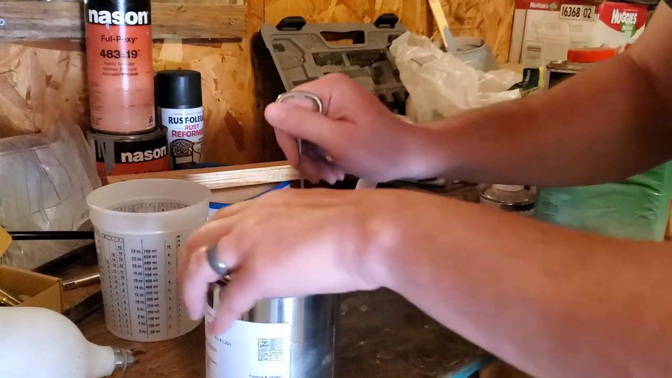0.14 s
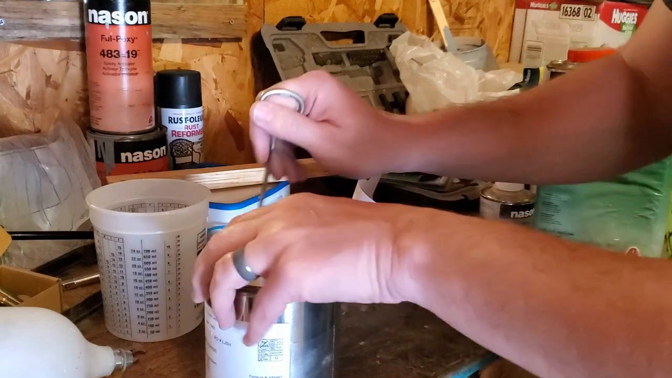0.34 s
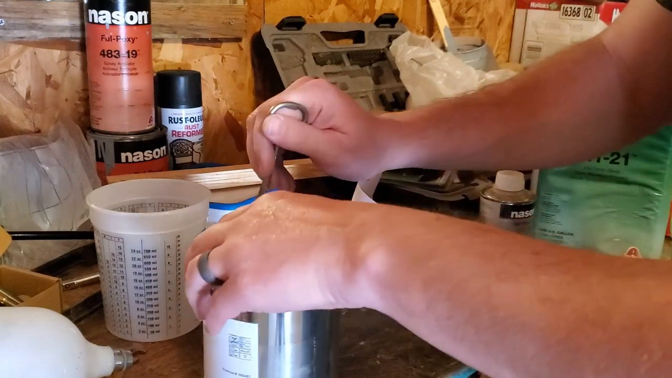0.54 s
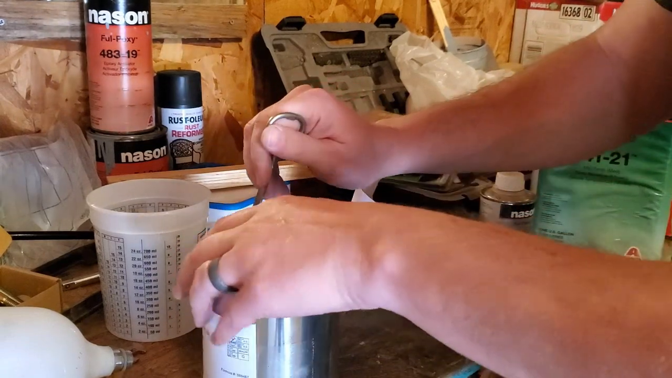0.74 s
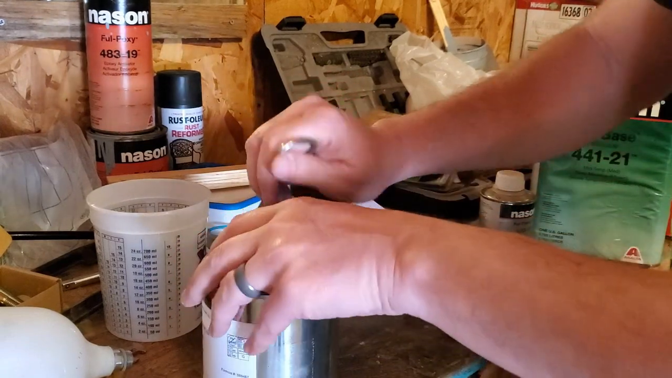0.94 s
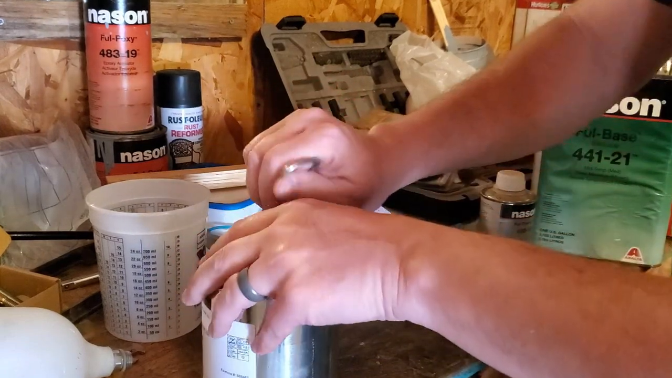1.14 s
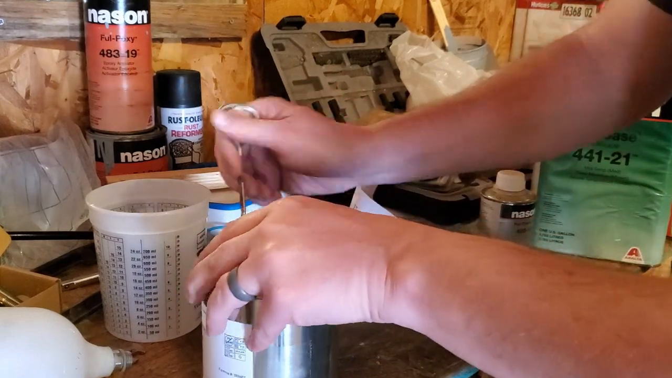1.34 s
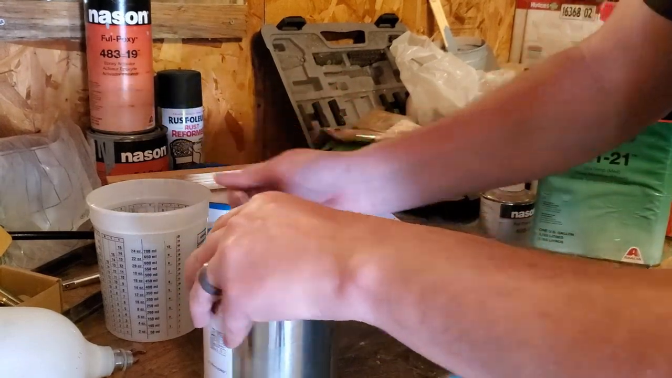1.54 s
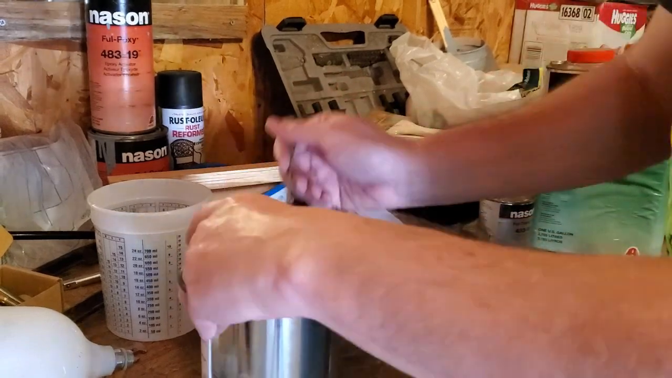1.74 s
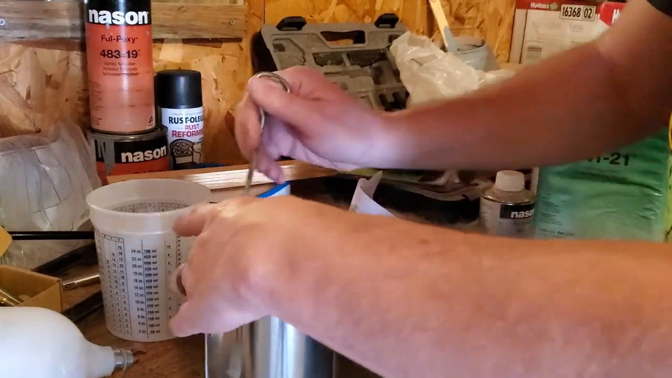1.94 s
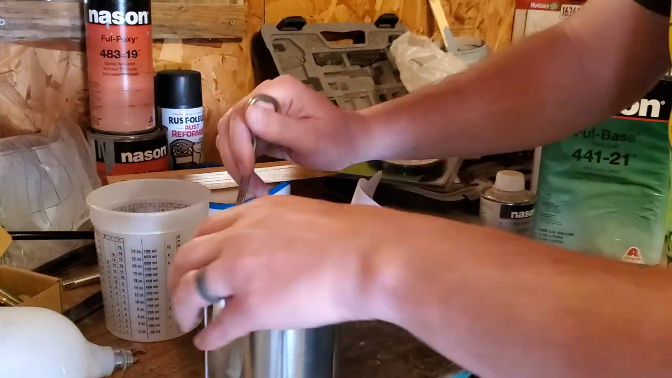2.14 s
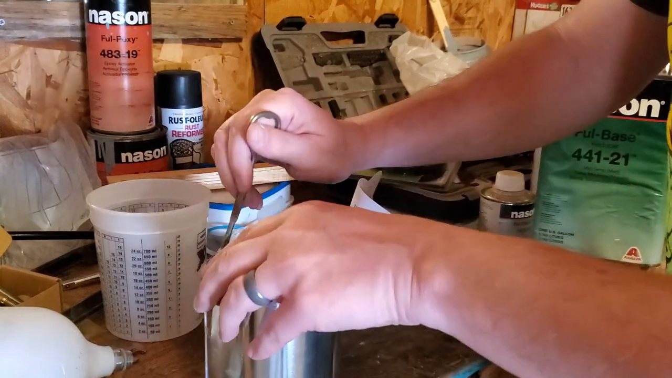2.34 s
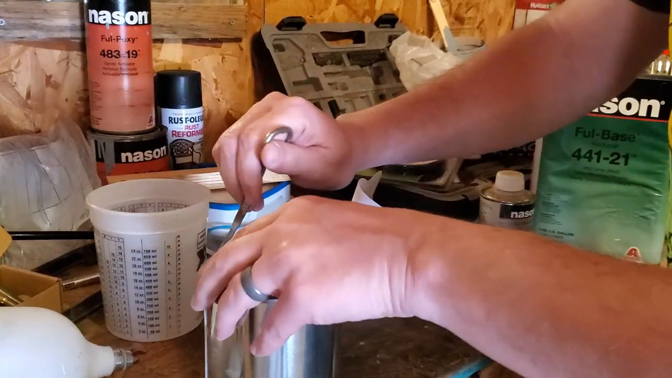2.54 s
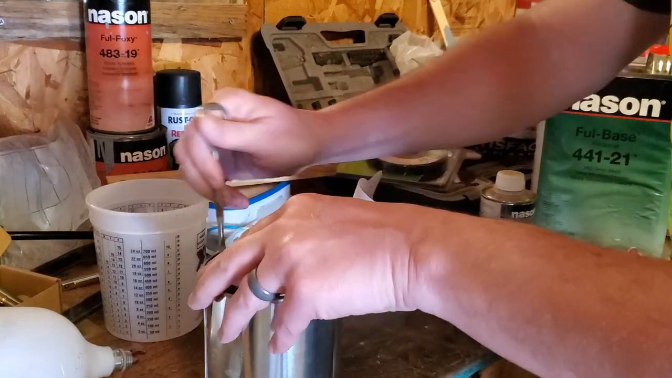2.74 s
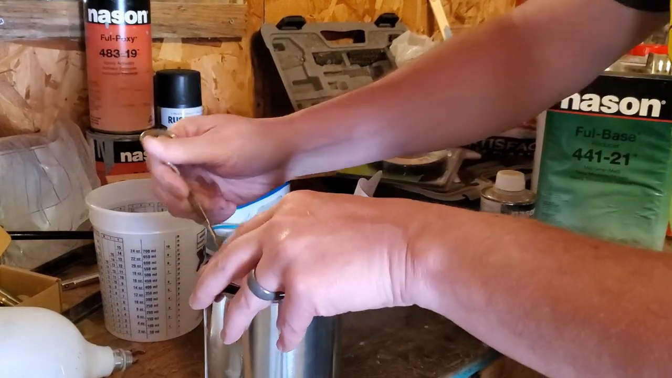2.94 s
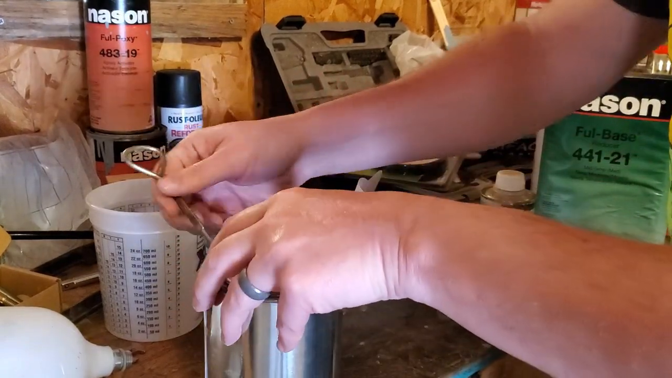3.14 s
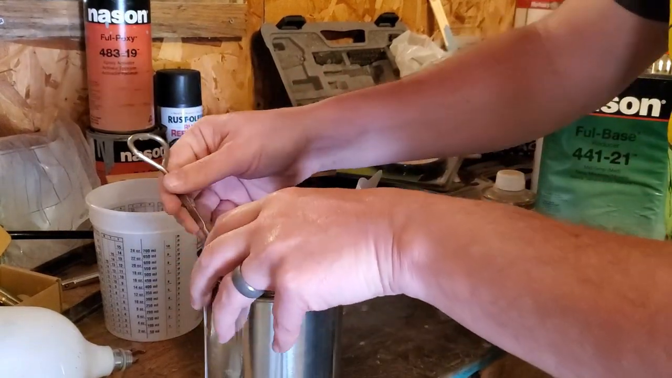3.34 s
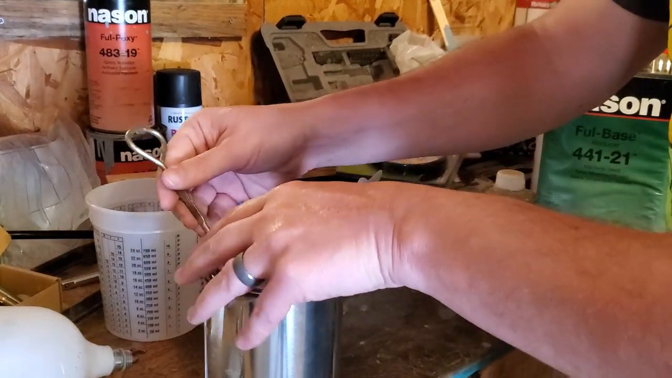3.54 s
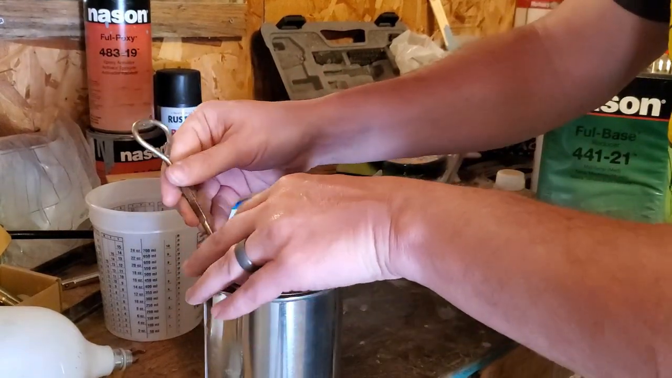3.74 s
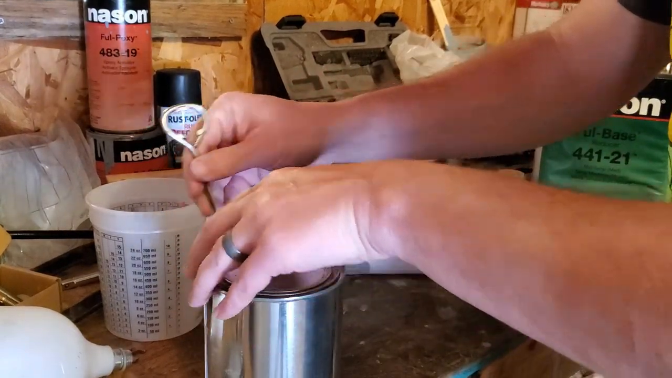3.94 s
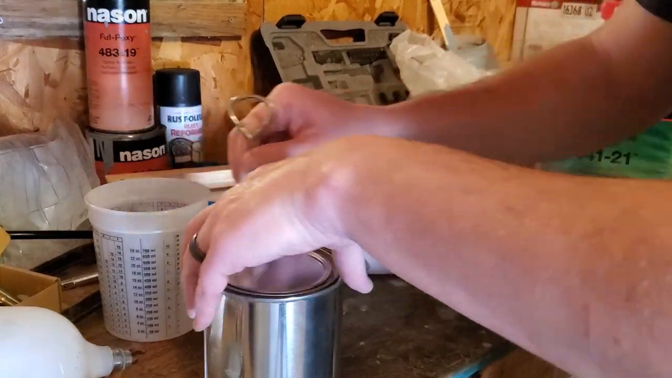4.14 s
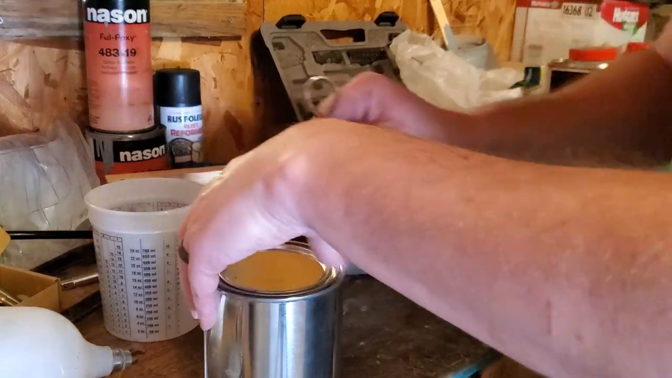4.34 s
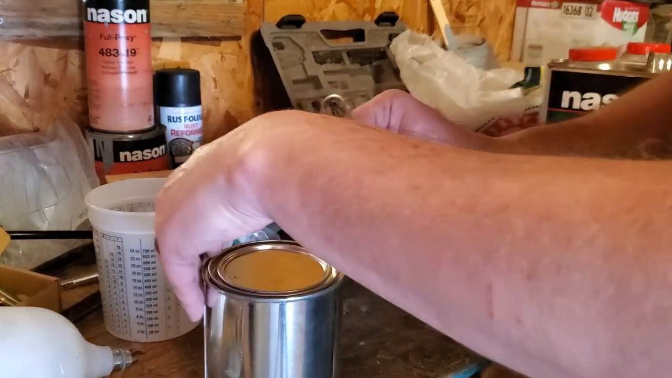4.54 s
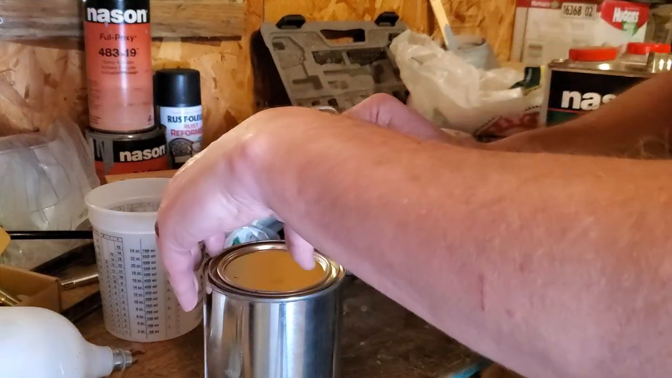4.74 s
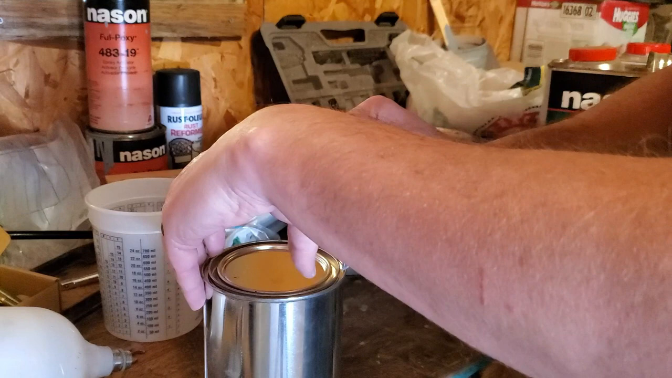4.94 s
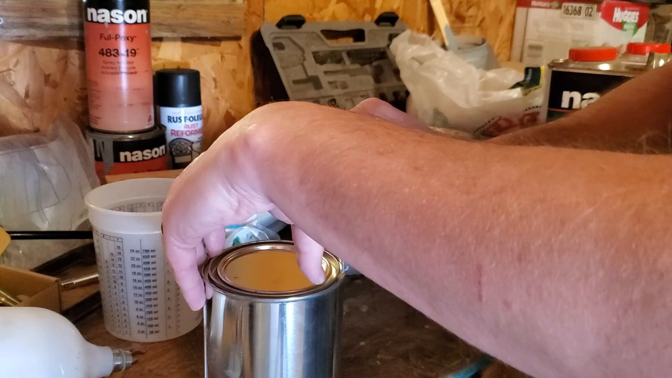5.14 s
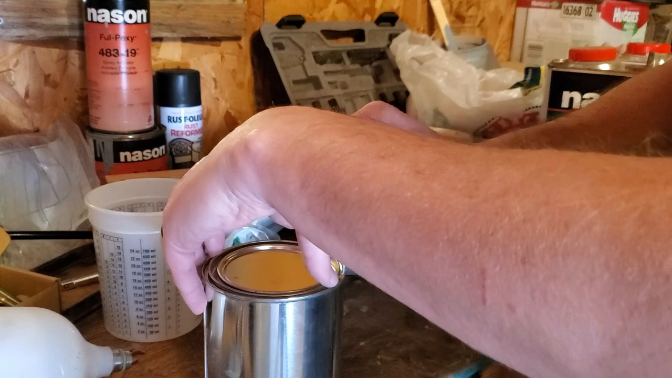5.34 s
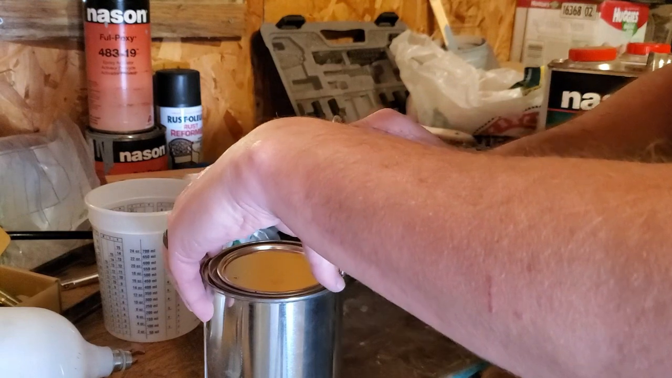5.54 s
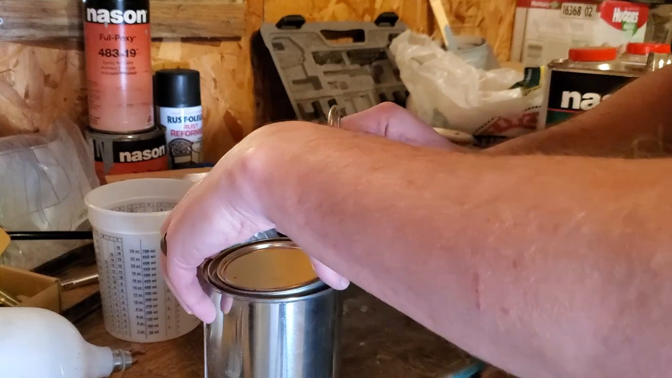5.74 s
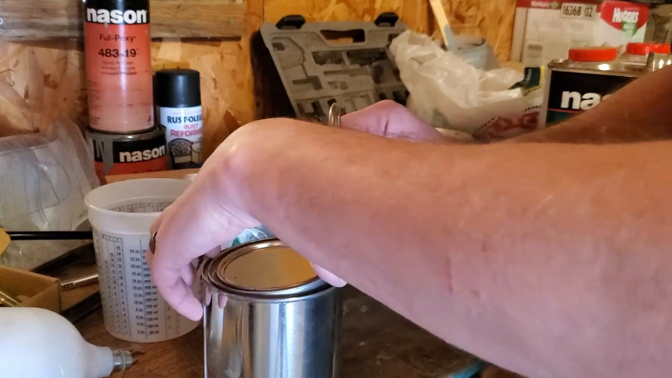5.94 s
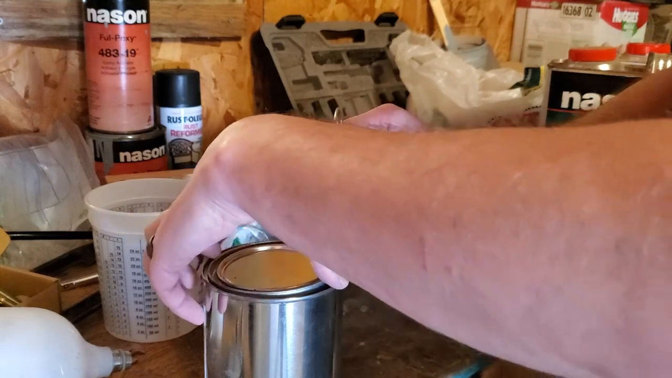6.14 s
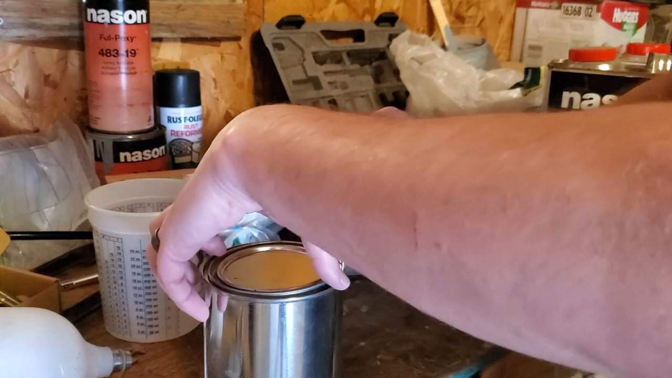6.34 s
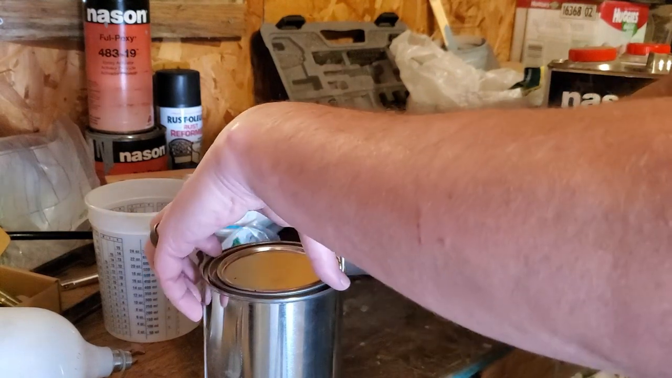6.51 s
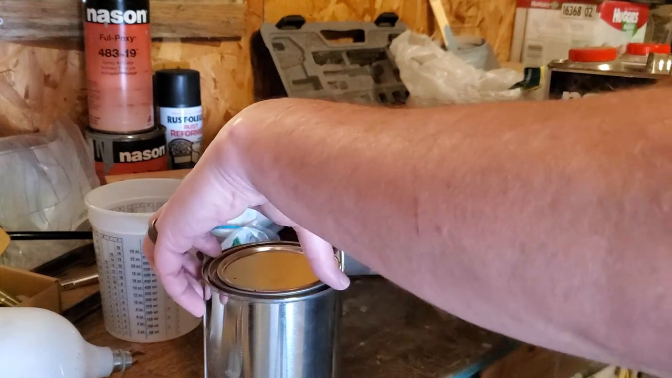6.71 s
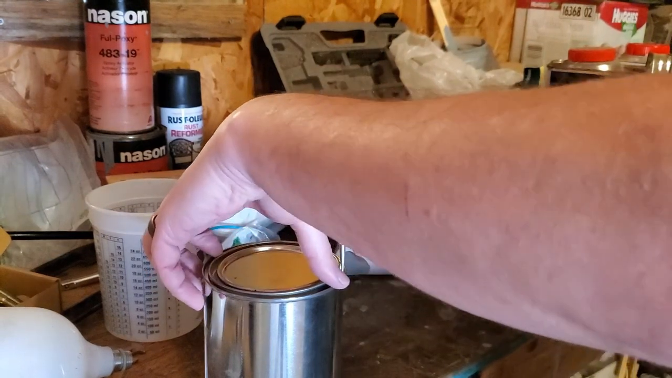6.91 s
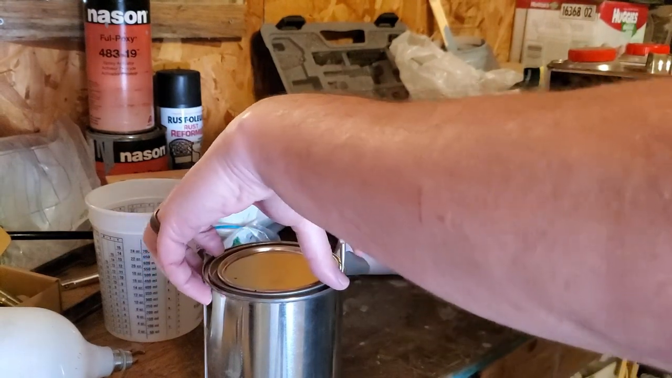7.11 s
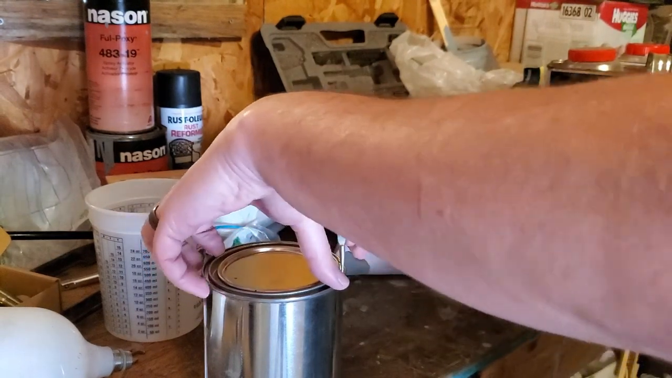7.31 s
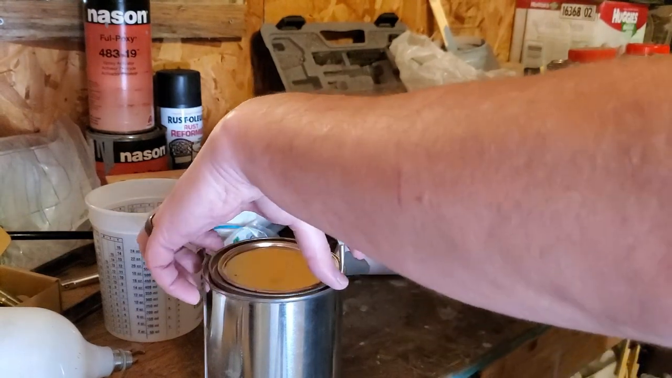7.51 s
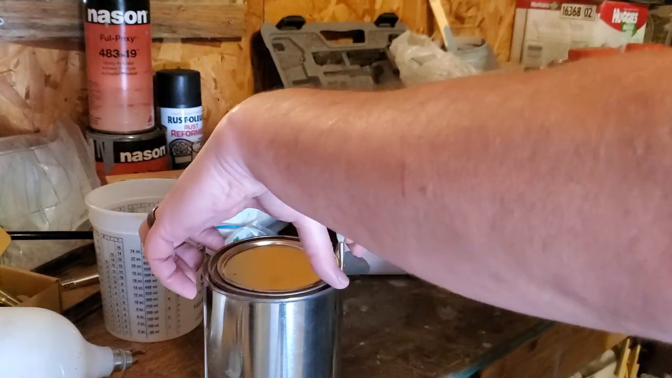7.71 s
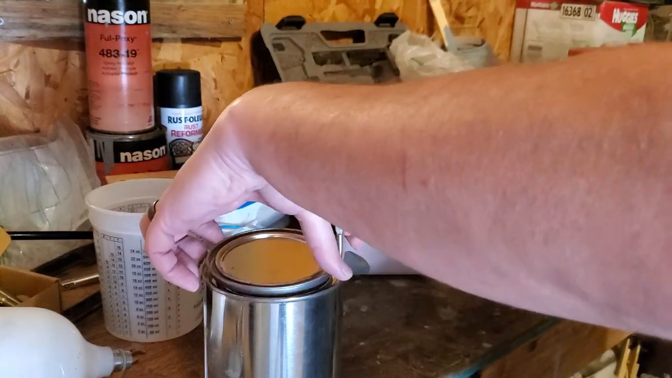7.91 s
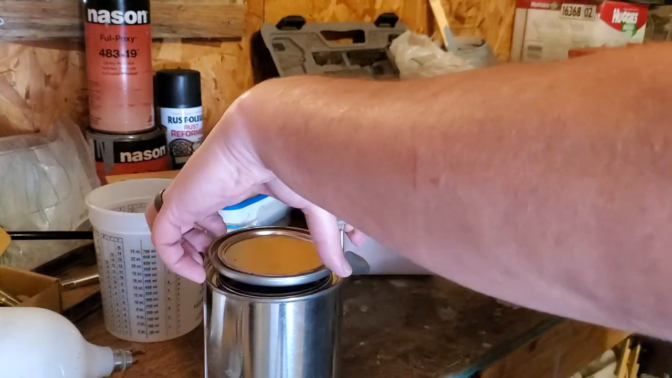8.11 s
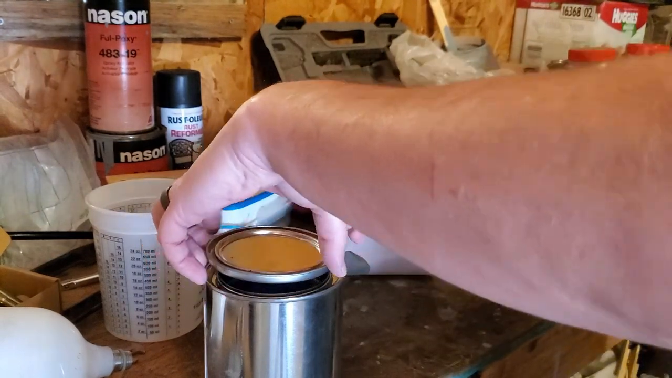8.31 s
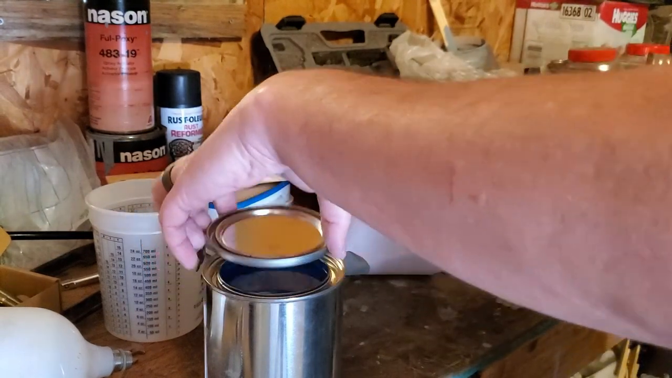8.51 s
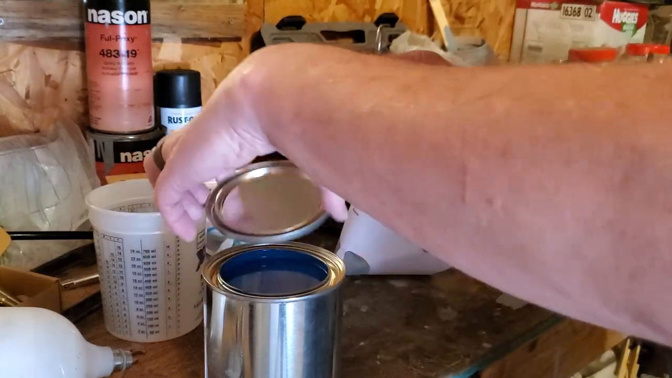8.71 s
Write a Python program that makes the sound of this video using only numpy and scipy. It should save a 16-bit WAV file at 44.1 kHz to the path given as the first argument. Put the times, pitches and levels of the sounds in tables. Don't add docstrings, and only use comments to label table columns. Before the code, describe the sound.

A steel opener clicks, knocks and rasps irregularly on a full metal paint can in a small workshop, then the lid creaks faintly loose.

```python
import sys
import numpy as np
from scipy import signal
from scipy.fft import rfft, irfft, next_fast_len
from scipy.io import wavfile
from scipy.ndimage import uniform_filter1d

SR = 44100
rng = np.random.default_rng(int(sys.argv[2]) if len(sys.argv) > 2 else 0)


def materialize(psi):
    bounded = np.clip(np.atleast_2d(psi).T, -1, 1)
    quanta = np.round(bounded * 32767).astype(np.int16)
    wavfile.write(sys.argv[1], SR, quanta)


def decibels_to_gain(level_db):
    exponent = np.asarray(level_db, float) / 20
    return 10 ** exponent


N = 386757

# (frequency [Hz], level [dB], t60 [s])
CAN_MODES = [(385, -2, .15), (440, -6, .1), (495, 0, .12), (560, -3, .1), (660, -13, .08), (850, -6, .06),
             (1015, -5, .08), (1184, -4, .08), (1400, -11, .05), (1585, -7, .06), (1750, -8, .05)]
# (frequency [Hz], level [dB], t60 [s])
RIM_MODES = [(2105, -9, .04), (2285, -8, .05), (2950, -12, .04), (3225, -11, .04), (3750, -9, .04),
             (4115, -8, .04), (5050, -11, .015), (5550, -10, .015), (6240, -9, .015), (6520, -8, .015),
             (10000, -10, .01), (11700, -10, .01), (13300, -8, .01), (15650, -10, .01)]
MODES = CAN_MODES + RIM_MODES
BAND_EDGES_HZ = [340, 700, 1750, 4300, 7500, 16100]
# (blow level [dB], unpitched share [dB], contact length [s], room t60 [s], room level [dB])
BANDS = [(3.92, 3, 0.00961, 0.36, 2), (4.5, -1.5, .006, 0.53, -3), (12.5, 3, 0.0043, 0.28, 0.5),
         (18.5, -7, 0.0028, 0.26, 0.5), (9.5, 4.5, 0.0015, 0.25, 1)]


def rms_one(x):
    return x / np.sqrt(np.mean(x ** 2) + 1e-20)


def band(x, low_hz, high_hz, order=2):
    return signal.sosfilt(signal.butter(order, [low_hz, high_hz], "band", fs=SR, output="sos"), x)


def band_of(hz):
    return int(np.clip(np.searchsorted(BAND_EDGES_HZ, hz) - 1, 0, 4))


def ring(clicks, hz, t60):
    r, w = decibels_to_gain(-60 / (t60 * SR)), 2 * np.pi * hz / SR
    return signal.lfilter([0, np.sin(w)], [1, -2 * r * np.cos(w), r * r], clicks + 1e-18)


def fader(points):
    s, db = np.transpose(points)
    out = np.full(N, -90.0)
    start, end = int(max(s[0], 0) * SR), min(int(s[-1] * SR), N)
    out[start:end] = np.interp(np.arange(start, end) / SR, s, db)
    return uniform_filter1d(decibels_to_gain(out), size=441)


def strokes(rows, colour_db, follows):
    rise_share, ends_db = 0.42, 22.5
    out = np.zeros((len(colour_db), N))
    for peak, length, level_db, *tilt in rows:
        rise, fall = rise_share * length, (1 - rise_share) * length
        start = max(int((peak - 2 * rise) * SR), 0)
        at = np.arange(start, min(int((peak + 2 * fall) * SR), N))
        away = np.interp(at / SR - peak, [-2 * rise, 0, 2 * fall], [2, 0, 2])
        band_db = level_db + np.add(colour_db, np.multiply(follows, sum(tilt)))
        out[:, at] += np.outer(decibels_to_gain(band_db), decibels_to_gain(-ends_db * away ** 1.7))
    return out


def balance(points, hz):
    points_hz, difference_db = np.transpose(points)
    return decibels_to_gain(np.interp(np.log(hz + 1), np.log(points_hz), difference_db) * [[.5], [-.5]])


def rubbing(grains_per_s, spread_db, pitched, size):
    height = decibels_to_gain(spread_db * np.minimum(rng.exponential(1, size), 5))
    slips = height * rng.choice([-1, 1], size) * (rng.random(size) < grains_per_s / SR)
    modal = np.zeros((5, size))
    for hz, mode_db, t60 in MODES:
        modal[band_of(hz)] += decibels_to_gain(mode_db) * ring(slips, hz, 0.072 * t60)
    out = []
    for k in range(5):
        raw = rms_one(band(slips, *BAND_EDGES_HZ[k:k + 2], order=3))
        out.append(rms_one(raw + pitched * rms_one(modal[k])))
    return np.array(out)


def soft_friction(gains):
    bands = np.tile(rubbing(5000, 2.2, 0.24, size=3 * SR), 3)[:, :N] * decibels_to_gain(-11.5) * gains
    bands[:2] = signal.lfilter([1], [1, -.93], bands[:2] + 1e-18) * [[.11], [.17]]
    bench_top = rms_one(band(rng.standard_normal(N), 130, 320, order=3))
    bands[0] += decibels_to_gain(-10.5) * gains[0] * bench_top
    return bands


def motor():
    # (time [s], level [dB])
    load = [(0.0, -50.5), (2.05, -51.5), (2.27, -60), (4.67, -61.5), (4.78, -72.5), (5.49, -55),
            (5.69, -54), (5.76, -75.5), (5.91, -52), (6.01, -66), (6.91, -57), (6.98, -75.5), (7.5, -50),
            (7.89, -76), (8.33, -55.5), (8.4, -66.5), (8.65, -56.5), (8.77, -72.5)]
    # (frequency [Hz], level [dB rms])
    far_tones = [(430, -92), (620, -87.5), (790, -87)]
    # (time [s], level [dB])
    swell = [(7.8, -21.5), (8.0, -5.5), (8.77, 5)]
    # (peak time [s], length [s], level [dB])
    shakes = [(.29, 0.14, -39), (1.25, 0.24, -52), (1.51, 0.21, -47.5), (2.81, 0.18, -54),
              (5.45, .4, -57.5), (6.35, 0.37, -60), (7.67, 0.24, -63), (8.5, .5, -57.5)]
    hum = fader(load)
    waver = rms_one(band(rng.standard_normal(N), .8, 4.0, order=1))
    tone = np.sqrt(2) * np.sin(2 * np.pi * 43.5 * np.arange(N) / SR + .3 * waver)
    overtones = 0
    for hz, tone_db in far_tones:
        overtones = overtones + decibels_to_gain(tone_db) * rms_one(ring(rng.standard_normal(N), hz, .2))
    steady = hum * tone + fader(swell) * overtones

    rumble = decibels_to_gain(-61) * (hum / hum.mean()) ** 0.26 + strokes(shakes, [0], [0])[0]
    mid, side = band(rng.standard_normal((2, N)), 52, 84.8, order=4)
    rumble_noise = (mid + 0.13 * side * [[1], [-1]]) / mid.std()
    return steady * decibels_to_gain([[.3], [-.3]]) + rumble * rumble_noise


def hiss():
    # (frequency [Hz], density [dB per Hz])
    air = [(100, -10), (150, -6), (230, -14.5), (310, -10.5), (360, -27), (650, -23.5)]
    # (frequency [Hz], density [dB per Hz])
    self_noise = [(1100, -32), (5700, -39.5), (6200, -28), (7100, -28.5), (7700, -32.5), (9000, -29),
                  (10500, -38), (15800, -41.5)]
    # (frequency [Hz], left minus right [dB])
    noise_balance = [(60, 1.0), (110, 0.0), (200, -2.5), (380, -6.5), (700, 1.0), (1290, 1.0), (2380, 0.0),
                     (4400, 1.0), (8120, 8.0), (15000, 2.0)]
    # (frequency [Hz], level [dB rms])
    whine_lines = [(14099, -104)]
    hz = np.fft.rfftfreq(N, 1 / SR) + 1
    points_hz, density_db = np.transpose(air + self_noise)
    colour = decibels_to_gain(np.interp(np.log(hz), np.log(points_hz), density_db))
    alike = np.clip(1 - hz / 900, 0, 1)
    mid, side = rfft(rng.standard_normal((2, N))) * colour
    ports = np.sqrt(1 + alike) * mid + np.sqrt(1 - alike) * side * [[1], [-1]]
    noise = irfft(ports * balance(noise_balance, hz), N)
    whine = 0
    for line_hz, line_db in whine_lines:
        whine = whine + decibels_to_gain(line_db + 4.5) * np.sin(2 * np.pi * line_hz * np.arange(N) / SR)
    return decibels_to_gain(-69.5) * noise / noise.mean(axis=0).std() + whine


def can_slides():
    # (peak time [s], length [s], tin level [dB], brightness [dB])
    turns = [(0.01, 0.22, -49, 0), (.57, 0.31, -57.5, 1.5), (1.44, 0.15, -57.5, -13), (1.5, 0.2, -68, 9),
             (1.6, 0.15, -55, 2.5), (1.69, 0.33, -53, 4.5), (1.8, .14, -72, -1), (1.95, 0.26, -55, 0.5),
             (2.045, 0.079, -57, -4.5), (3.32, .1, -74.5, -5.5), (3.47, 0.26, -77, -5.5),
             (5.26, 0.055, -69.5, -16), (5.36, 0.28, -66.5, -9.5), (5.63, 0.45, -72, -12)]
    return soft_friction(strokes(turns, [-1.5, 2, -4.5, -7.5, -19], [-0.68, 0.088, 1, 0.95, .7]))


def blows():
    # (time [s], tin peak [dB], can body re tin [dB], brightness re tin [dB])
    knocks = [(0.249, -39.5, 0.5, -12), (0.874, -37.5, -0.5, -23), (0.899, -37.5, 1.5, -10.5),
              (1.161, -23, -3.5, -6.5), (1.428, -46, 4, -11), (1.633, -39.5, -8.5, -19),
              (1.73, -41, -11, -23), (1.812, -38, -19, -32), (1.826, -34, -10.5, -10),
              (2.011, -48, 0, -11.5), (2.401, -49, -2, -9), (2.444, -48, 7.5, -8), (2.692, -20, -8.5, -14),
              (3.155, -37.5, -21, -7.5), (3.186, -36, -13.5, -11), (3.423, -56.5, 6, 4.5),
              (3.894, -54.5, -14, -5), (3.969, -42, -5.5, -12.5), (5.113, -41.5, 2.5, -14),
              (5.5, -38.5, 4, -0.5), (5.528, -39, 4, -18), (5.739, -45, -7, -4.5), (6.246, -63.5, 6.5, 2),
              (6.298, -44, -7, -5), (6.663, -48, 7, -9), (7.62, -61, 3, 0)]
    # (time [s], tin peak [dB], can body re tin [dB], brightness re tin
    # [dB])
    more_knocks = [(0.012, -49.5, 0, -2), (0.072, -57.5, 10.5, -8), (1.203, -41.5, 3.5, -31),
                   (1.324, -46.5, -3, -18.5), (1.395, -51, -15, -15), (1.463, -47.5, -2, -9),
                   (1.586, -58, -7, 0.5), (2.479, -62, 7, -21), (2.734, -35.5, -5, -27), (2.935, -54, -6, -27),
                   (3.34, -62, 2.5, -4), (5.152, -46, -3.5, -20), (5.339, -63, 6, -32), (5.466, -63, 10.5, -16),
                   (5.564, -57, 9, -8), (6.236, -66, -5, 3), (6.587, -65, 9, -5), (6.702, -54.5, -6, -40),
                   (7.068, -72, 15, -25), (7.093, -57, 2, -38), (7.159, -66, -6, -12), (7.399, -62, 6, -45),
                   (7.915, -70.5, 0, -5.5), (8.269, -73.5, -20.5, 13.5), (8.389, -80.5, -16, 11.5),
                   (8.584, -69.5, -14.5, 1.5)]
    s, tin_db, body_db, bright_db = np.transpose(knocks + more_knocks)
    rim_db = -11.5 + 0.56 * bright_db
    edge_db = -14.5 + 0.51 * bright_db
    colour_db = np.c_[body_db, 0 * body_db, rim_db, bright_db, edge_db]
    level_db = tin_db[:, None] + colour_db + np.array(BANDS)[:, 0]

    at, out, t = np.round(s * SR).astype(int), np.zeros((5, N)), np.arange(2048) / SR
    chance = rng.standard_normal((len(at), 30))
    chatter = rng.standard_normal((len(at), 2048))
    softness = np.clip(decibels_to_gain(-.5 * (bright_db[:, None] + 9.0)), .6, 3.0)
    spread = at[:, None] + np.arange(2048)
    for k, (_, share_db, length, _, _) in enumerate(BANDS):
        lasts = length * softness
        shape = (1 - np.exp(-t / (0.15 * lasts))) * np.exp(-t / lasts)
        if k == 0:
            shape = shape * np.clip(t / length, 0, 1)
        height = decibels_to_gain(level_db[:, [k]] + share_db) * np.sqrt(SR / 8 / BAND_EDGES_HZ[k + 1])
        np.add.at(out[k], spread, height * chatter * shape)
        out[k] = band(out[k] + 1e-18, *BAND_EDGES_HZ[k:k + 2], order=3)
    out[:3] = signal.lfilter([1], [1, -.85], out[:3]) * [[.17], [.22], [.4]]

    for m, (hz, mode_db, t60) in enumerate(MODES):
        k = band_of(hz)
        clicks = np.zeros(N)
        delay = (SR * .6 * BANDS[k][2] * abs(chance[:, -1 - m % 2])).astype(int)
        clicks[at + delay] = decibels_to_gain(level_db[:, k] + mode_db - 12 + 2 * chance[:, m])
        out[k] += ring(clicks, hz, .75 * t60)
    return out


def thumps():
    # (time [s], peak level [dB], bench pitch [Hz])
    rocks = [(0.017, -41, 132), (0.073, -37.5, 144), (0.254, -28.5, 260), (0.875, -57, 301),
             (1.164, -33, 276), (1.498, -48, 189), (1.832, -45, 320), (2.011, -47.5, 148),
             (2.451, -57.5, 324), (2.701, -37.5, 308), (3.17, -52, 302), (4.285, -48, 150),
             (5.126, -62.5, 304), (5.529, -50.5, 273), (6.301, -42.5, 146), (6.678, -66, 314)]
    out, t = np.zeros((5, N)), np.arange(SR // 4) / SR
    for s, thump_db, hz in rocks:
        push = rng.standard_normal(len(t)) * t / .012 * np.exp(1 - t / 0.0077)
        board = band(push, 0.4 * hz, 340, order=3) + 0.012 * ring(push, hz, 0.045)
        out[0, round(s * SR):][:len(t)] += decibels_to_gain(thump_db - 1.0) * board / abs(board).max()
    return out


def ringing():
    # (time [s], level [dB], frequency [Hz])
    damped = [(0.895, -52, 3000), (.251, -53.5, 4125), (6.299, -54, 1545), (0.25, -48, 1280),
              (.25, -56, 2299), (.25, -60, 3420), (.255, -48, 635), (.873, -40, 1492), (1.1, -66.5, 1470),
              (1.165, -48, 1570), (1.168, -31, 402), (1.169, -29.5, 502), (2.702, -36.5, 401),
              (2.702, -46.5, 497), (3.18, -46.5, 855), (5.528, -44, 504.5), (5.526, -46, 1184),
              (5.528, -49, 1588), (5.113, -53, 495), (5.135, -62, 6150), (5.5, -56, 6266),
              (1.826, -50.5, 4115), (1.815, -50.5, 1560), (2.011, -57, 1560), (2.402, -55, 2130),
              (2.443, -56.5, 1560), (2.692, -54.5, 5190), (2.933, -68, 2520), (3.894, -70, 2800),
              (5.739, -57, 1500), (5.739, -58, 2287), (3.17, -50, 4165), (3.158, -52, 2455),
              (3.158, -58, 5152), (3.158, -52, 860), (3.17, -52, 1595), (3.424, -64, 5650),
              (3.43, -67, 480), (3.34, -70, 450), (1.432, -55, 500), (.876, -41, 520), (5.115, -57, 2906),
              (5.498, -51, 2290), (5.736, -55.5, 4040), (1.828, -48.5, 900), (8.268, -72, 1600),
              (6.245, -60, 543), (6.3, -58, 543), (6.298, -61, 4984), (6.665, -50, 495), (6.665, -68, 5022),
              (7.085, -56, 430), (7.12, -66, 855), (7.4, -57, 495), (7.62, -63, 861), (8.268, -76, 5383),
              (8.585, -80, 5022), (2.692, -46, 6300), (1.162, -45, 6400)]
    # (time [s], level [dB], frequency [Hz])
    free = [(2.692, -54, 3233), (3.165, -54, 1586), (3.892, -62.5, 1567), (5.115, -60.5, 2348),
            (5.345, -71, 1148), (5.345, -64.5, 630), (5.5, -66, 3350), (6.245, -64, 847), (6.3, -57.5, 836),
            (8.268, -74.5, 1590), (8.275, -78, 5020), (8.268, -79, 4095), (8.285, -82, 2970),
            (2.444, -62, 1560), (3.2, -66, 3780)]
    out, t = np.zeros((5, N + SR)), np.arange(SR // 4) / SR
    for rows, longest_t60 in [(damped, 0.079), (free, 0.24)]:
        for s, ring_db, hz in rows:
            detune = 1 + rng.uniform(-1, 1, (5, 1)) * [[0], [.015], [.03], [.05], [.07]]
            partials = np.sin(2 * np.pi * hz * detune * t) * [[.9], [.7], [.6], [.5], [.4]]
            rough = .9 + .8 * rms_one(band(rng.standard_normal(len(t)), 20, 250, order=1))
            t60 = min(longest_t60, 900 / hz)
            gain = decibels_to_gain(ring_db - 60 * t / t60) * np.clip(t * hz / 2, 0, 1)
            out[band_of(hz), round(s * SR):][:len(t)] += gain * np.sum(partials, axis=0) * rough
    return out[:, :N]


def singing():
    # (peak time [s], length [s], level [dB], frequency [Hz])
    sung = [(4.075, .07, -46, 2280), (4.085, .08, -46, 1090), (4.095, .07, -50, 530),
            (4.075, .07, -54, 4160), (4.075, .07, -53, 5350), (4.07, .06, -54, 6540),
            (4.165, .07, -50, 855), (4.16, .08, -57, 540), (4.17, .07, -57, 1500), (4.225, .09, -44, 1595),
            (4.21, .05, -48, 3770), (4.235, .08, -43, 4120), (4.265, .07, -49, 5300),
            (4.24, .07, -48, 6255), (4.25, .06, -50, 6780), (4.255, .06, -52, 5700), (4.3, .05, -53, 5035),
            (4.272, .025, -53, 480), (5.38, .12, -62, 670), (4.2, .05, -53, 850), (1.05, .25, -74, 1480),
            (8.56, .2, -84, 1600), (7.93, .1, -77, 700)]
    out = np.zeros((5, N))
    for peak, length, level_db, hz in sung:
        near = slice(int(peak * SR) - SR // 2, int(peak * SR) + SR // 2)
        gain = strokes([(peak, length, level_db)], [0], [0])[0, near]
        out[band_of(hz), near] += gain * rms_one(ring(rng.standard_normal(SR), hz, .035))[:len(gain)]
    return out


def fingertips():
    # (peak time [s], length [s], level [dB], brightness [dB])
    glides = [
        (1.65, .9, -80, -1.2),
        (3.42, .3, -77, -4.2),
        (3.7, 1, -80, -3.5),
    ]
    bands = np.zeros((5, N))
    low, high = strokes(glides, [-4, -3], [-1, 1])
    bands[3] = low * rms_one(band(rng.standard_normal(N), 5600, 7200))
    bands[4] = high * rms_one(band(rng.standard_normal(N), 10600, 12000))
    return bands


def drag():
    # (peak time [s], length [s], tin level [dB], brightness [dB])
    rasps = [(4.043, .03, -43, -2), (4.064, 0.075, -38.5, 3), (4.098, 0.045, -43, -9),
             (4.165, 0.088, -45.5, -9), (4.208, 0.055, -45.5, 11.5), (4.238, 0.05, -44.5, 17),
             (4.265, 0.028, -45.5, 13), (4.31, 0.041, -60, -33), (5.51, 0.054, -57, 18)]
    slips = np.tile(rubbing(4000, 3.0, 0.32, size=SR), N // SR + 1)[:, :N]
    return slips * decibels_to_gain(-8) * strokes(rasps, [-6.5, 1.5, -0.5, -0.7, -8], [-0.51, -0.051, 0.52, 0.92, 1.0])


def lid_creaks():
    # (peak time [s], length [s], tin level [dB], brightness [dB])
    creaks = [(6.59, 0.31, -77.5, -12.5), (6.655, 0.072, -62, 4), (7.04, 0.11, -83.5, -19),
              (7.11, 0.17, -68.5, -8.5), (7.43, 0.3, -66.5, -6.5), (7.61, 0.045, -74.5, -18.5),
              (7.73, 0.11, -71, -3), (7.93, 0.22, -81, -11.5), (8.31, 0.19, -84.5, 7), (8.38, .1, -90, -4),
              (8.74, .2, -86.5, -3)]
    return soft_friction(strokes(creaks, [4.0, 7.5, -21, -30, -40], [-1.01, 0.96, .4, 0.48, .4]))


def workshop(bands):
    # (frequency [Hz], left minus right [dB])
    port_balance = [(60, 0.5), (110, 0.5), (200, 0.5), (380, 0.0), (700, 0.0), (1290, 2.0), (2380, 0.5),
                    (4400, -0.5), (8120, -1.5), (15000, 1.0)]
    left_lead_s, tail_cut_s = 0.00012, 0.2
    size, short, t = next_fast_len(N + SR), 2 ** 15, np.arange(SR // 2) / SR
    hz, out = np.fft.rfftfreq(short, 1 / SR), 0
    direct = np.exp(-2j * np.pi * hz * [[0], [left_lead_s]])
    alike = np.clip(2.2 - hz / 300, 0, .97)
    noise = rng.standard_normal((2, len(t)))
    for x, (_, _, _, t60, room_db) in zip(bands, BANDS):
        early = 1 + 3.3 * np.exp(-t / 0.0033)
        decay = decibels_to_gain(-60 * t / t60 - 7.9 * (t / tail_cut_s) ** 3)
        fade = early * decay * np.clip(t / 0.0013 - .5, 0, 1)
        mid, side = rfft(rms_one(noise * fade) / np.sqrt(len(t)), short)
        tail = np.sqrt(1 + alike) * mid + np.sqrt(1 - alike) * side * [[1], [-1]]
        heard = direct + decibels_to_gain(room_db) * tail
        colour = uniform_filter1d(abs(heard) ** 2, size=70, axis=1) / (1 + 2 * decibels_to_gain(2 * room_db))
        fold = np.r_[1, np.full(short // 2 - 1, 2), np.zeros(short // 2)]
        cepstrum = irfft(-.5 * np.log(colour), short) * fold
        response = irfft(heard * np.exp(rfft(cepstrum)))[:, :len(t)]
        out = out + rfft(x, size) * rfft(response, size)
    hz = np.fft.rfftfreq(size, 1 / SR)
    port_notch = 1 - .85 * np.exp(-((hz - 7950) / 650) ** 2)
    port_peak = 1 + .8 * np.exp(-((hz - 15700) / 200) ** 2) + .7 * np.exp(-((hz - 13400) / 450) ** 2)
    bench = (1 - 0.5 * np.exp(-((hz - 335) / 25) ** 2)) * (1 - .2 * np.exp(-((hz - 730) / 45) ** 2))
    bass_cut = hz ** 2 / (hz ** 2 + 130 ** 2.0)
    out = out * port_notch * port_peak * bench * bass_cut * balance(port_balance, hz)
    return irfft(out, size)[:, :N]


def scene():
    struck = blows() + thumps() + ringing()
    struck[:2] = band(struck[:2], 60, 2100, order=2)
    rubbed = can_slides() + singing() + fingertips() + drag() + lid_creaks()
    return motor() + hiss() + workshop(struck + rubbed)


def band_limit(x):
    return signal.sosfilt(signal.butter(12, 16510, fs=SR, output="sos"), x)


def record(dry):
    low_cut = signal.sosfilt(signal.butter(4, 33, "high", fs=SR, output="sos"), dry)
    top_cut = signal.sosfilt(signal.cheby2(24, 70, 16050, fs=SR, output="sos"), low_cut)
    return band_limit(top_cut)


dry = scene()
out = record(dry)
materialize(out)
```